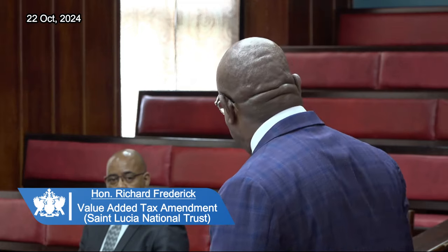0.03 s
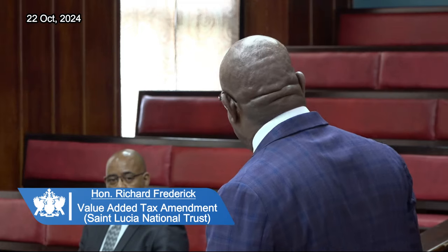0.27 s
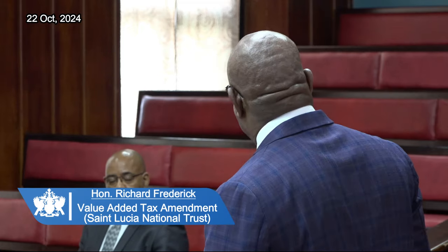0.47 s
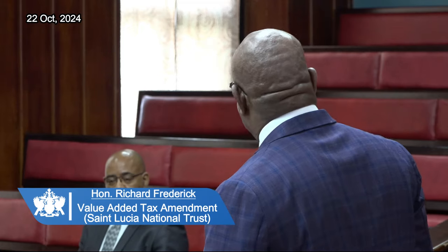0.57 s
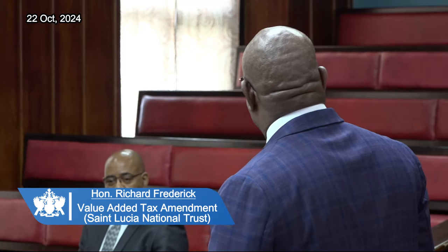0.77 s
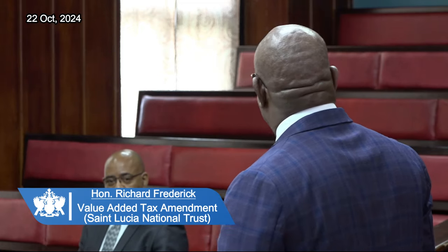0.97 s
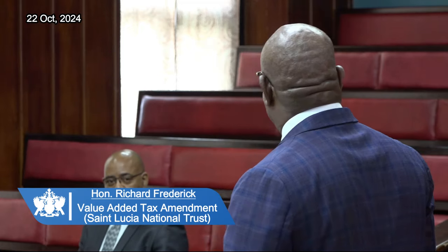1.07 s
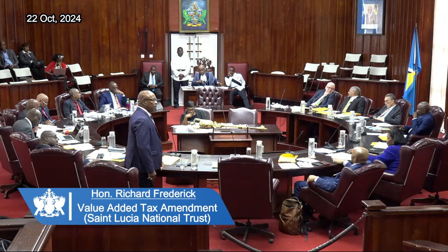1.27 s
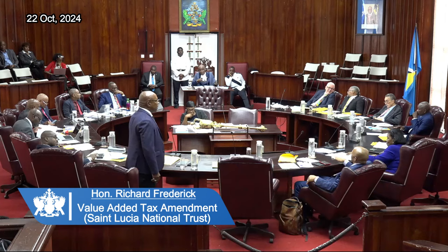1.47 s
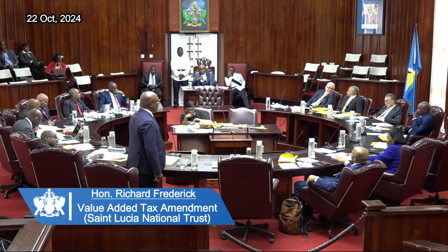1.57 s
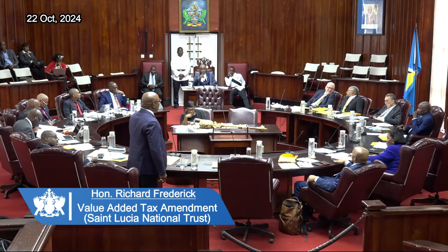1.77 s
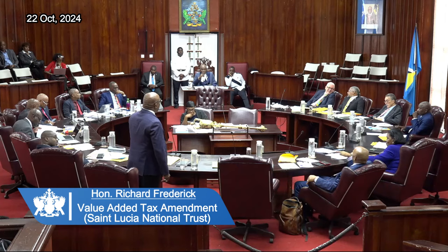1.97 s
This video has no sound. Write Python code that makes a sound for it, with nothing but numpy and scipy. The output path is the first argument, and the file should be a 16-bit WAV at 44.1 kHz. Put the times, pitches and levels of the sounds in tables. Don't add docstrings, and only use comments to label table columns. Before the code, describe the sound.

Hands pounding wooden desks in a steady fast rhythm, loud and close in a panelled chamber

```python
import sys
import numpy as np
from scipy import signal
from scipy.fft import rfft, irfft
from scipy.io import wavfile
from scipy.ndimage import uniform_filter1d

SR = 44100
rng = np.random.default_rng(int(sys.argv[2]) if len(sys.argv) > 2 else 0)


def to_linear_factor(level_db):
    exponent = np.asarray(level_db, float) / 20
    return 10 ** exponent


def waveform_to_disk(signal):
    frames = np.transpose(np.atleast_2d(signal))
    scaled = np.clip(frames, -1, 1) * 32767
    samples = np.round(scaled).astype(np.int16)
    wavfile.write(sys.argv[1], SR, samples)


N = 88817

# f/Hz, level/dB
AIR_TONE = [(30, 2), (90, -3), (250, -7), (1000, -15), (3000, -18), (7000, -29), (14000, -39)]
# f/Hz, level/dB
HALL_TONE = [(35, -36), (60, -15.5), (189, -4), (255, -7.5), (328, -5.5), (767, -15), (2110, -14.5),
             (3920, -24.5), (14500, -56.5)]
# f/Hz, t60/s
EARLY_DECAY = [(60, 1), (250, 0.22), (1000, 0.61), (3000, 0.37), (8000, .35), (14000, 0.75)]
# f/Hz, t60/s
LATE_DECAY = [(60, 0.4), (250, 1.11), (1000, 1.08), (3000, 0.95), (8000, 0.94), (14000, 1.1)]
# t/s, slap level/dB, slap f/Hz, skin crack level/dB, hall level/dB
BLOWS = [(.011, 3.5, 807, -6.5, -8.5), (0.0162, -11, 745, -5, -12.5), (.328, -11.5, 1140, -7.5, -16),
         (0.3431, 0.5, 817, -4.5, -9.5), (0.65, 1.5, 843, -6, -11), (.661, -27, 900, -9, -13),
         (.955, 0.5, 1070, -10.5, -10.5), (1.292, -14, 1400, -11.5, -14.5), (1.298, 1, 1160, -11.5, -13),
         (1.616, -13.5, 870, -11.5, -26.5), (1.641, -3, 1100, -10.5, -14.5), (1.9416, -15, 924, -16.5, -25)]
# knock level/dB, sheen level/dB, body level/dB
PALMS = [(-1.5, 10, -5.5), (1, 2, 5.5), (-9, 5.5, 3.5), (6, 0.5, -3.5), (-2, 4.5, 2), (-1, 5.5, 0.5),
         (-3.5, 4.5, -0.5), (-6.5, 1, 1.5), (7, 3.5, -7), (-4.5, 5.5, -4), (6.5, 1.5, -1.5),
         (-1.5, 4.5, 13)]
# second knock f/Hz, its level/dB, distance/share of the usual, knock width/Hz
SPOTS = [(1375, 2, .6, 165), (450, 2, 0.49, 120), (2680, 5, 0.44, 91), (1300, 1, 0.68, 77),
         (458, 6.5, .3, 67), (1300, -6, 0.45, 200), (1700, 2.5, .6, 92), (2260, 2, 0.62, 140),
         (1790, 4.5, .5, 200), (1310, -14, 0.58, 170), (1250, -19, 0.89, 380), (600, 5, .9, 69)]
WALL_RETURNS = [-2, -14, -14, 0, -6, -14, 0, -12, 0, -12, -2, -14]
# f/Hz, level/dB
CRACK_TONE = [(500, 4), (1500, 5), (3500, 2.5), (6000, -10.5), (10000, -16), (14000, -23.5)]
# f/Hz, level/dB, t60/s
WOOD_MODES = [(412.4, 3, 0.033), (533, -3.5, 0.047), (583, -51.5, 0.047), (772, -22.5, 0.16),
              (1061, -17.5, 0.082), (1270, -9, 0.044), (1646, -18.5, 0.16)]
# delay/s, level/dB
ECHOES = [(.0045, -12), (.018, -2), (.027, -14), (.040, -9), (.059, -14)]
# t/s, carcass level/dB, top panel level/dB, front panel level/dB, front panel f/Hz
BOOMS = [
    (0.014, -7, -5.5, 0, 307),
    (0.33, -10.5, -4, -6.5, 250),
    (0.346, -19, -19.5, -6.5, 316),
    (.650, -8.5, -7, -2.5, 284.8),
    (0.955, -21, -12.5, -13.5, 304.7),
    (1.299, -21.5, -5.5, -12, 297.4),
    (1.617, -23.5, -8, -8.5, 262.6),
    (1.642, -21, -4.5, -7, 317.2),
    (1.941, -26, -11.5, -17.5, 289),
]
BOOM_HOLDS = [0.98, 0.53, 1.3, 0.89, 1.52, 0.99, 0.5, 0.85, 1.06]
# f/Hz, level/dB, hold/s, t60/s, part (0 carcass, 1 top panel)
PANEL_MODES = [(36.7, -11.5, 0.02, 0.48, 0), (47.6, -12.5, .05, 0.73, 0), (69.2, -5.5, 0.038, 0.71, 0),
               (82.1, -8, 0.057, 0.79, 0), (130.6, -8, 0.027, 0.69, 0), (164.5, -14.5, 0.091, 0.25, 1),
               (200.17, -2.5, 0.051, 0.3, 1)]
# t/s, level/dB
TICKS = [(.225, -36), (0.589, -47), (0.655, -37), (.668, -24), (1.303, -43), (1.613, -41), (.983, -40),
         (0.99, -24.5), (1.137, -47), (1.435, -33.5), (1.737, -44)]

BEND_S, BEND_KNEE_HZ = 0.005, 297.2
FRONT_HOLD_S, FRONT_T60_S = 0.031, 0.33
LINGER_DB, CARCASS_LINGER_DB = -14, -7.5


def evened(x):
    return x / np.sqrt(np.mean(x ** 2) + 1e-20)


def read(points, hz):
    f, value = np.transpose(points)
    return np.interp(np.log(hz + 1), np.log(f + 1), value)


def add(mix, s, sound):
    part = mix[max(round(s * SR), 0):][:len(sound)]
    part += sound[:len(part)]


def colour(x, gain):
    return irfft(rfft(x) * gain(np.fft.rfftfreq(len(x), 1 / SR)), len(x))


def bump(hz, centre_hz, width):
    return np.exp(-0.5 * (np.log2((hz + 1) / centre_hz) / width) ** 2)


def burst(length_s, points):
    t = np.arange(1024) / SR
    puff = rng.standard_normal(1024) * (t / length_s) * np.exp(-t / length_s * 2)
    puff = colour(puff, lambda hz: to_linear_factor(read(points, hz)))
    return puff / abs(puff).max()


def air():
    hush = colour(rng.standard_normal(N), lambda hz: to_linear_factor(read(AIR_TONE, hz)))
    return to_linear_factor(-47.5) * evened(hush)


def hall():
    late_db, build_s, lumpy_db = -11.5, 0.034, 1.5
    hz = np.fft.rfftfreq(256, 1 / SR)[:, None]
    t = np.arange(700) * 64 / SR
    a, b, lumps = rng.standard_normal((700, 129, 3)).T
    lumps = uniform_filter1d(lumps, size=24, axis=0)
    lumps = evened(uniform_filter1d(lumps, size=3, axis=1))
    early = to_linear_factor(-60 * t / read(EARLY_DECAY, hz))
    late = to_linear_factor(late_db - 60 * t / read(LATE_DECAY, hz))
    z = (a + 1j * b) * np.hypot(early, late) * to_linear_factor(lumpy_db * lumps) * np.minimum(t / build_s, 1)
    tail = signal.istft(z, nperseg=256, noverlap=192)[1]
    tail = colour(tail, lambda f: to_linear_factor(read(HALL_TONE, f)))
    return tail / np.sqrt(np.mean(tail[:SR // 10] ** 2))


def palm(knock_db, sheen_db, body_db):
    def gain(hz):
        knock = knock_db * bump(hz, 3330, 0.31)
        sheen = sheen_db * bump(hz, 7160, 0.31)
        body = body_db * bump(hz, 480, 0.4)
        return to_linear_factor(knock + sheen + body)
    return gain


def slap(pitch_hz, second_hz, second_db, far, width_hz):
    size, skirt_db, knock_db, wave_top_hz = 8192, -3.5, 11, 4600
    hz = np.fft.rfftfreq(size, 1 / SR)
    broad = bump(hz, pitch_hz, 0.5) + to_linear_factor(skirt_db) * bump(hz, pitch_hz, 1.81)
    first = 1 / (1 + 2j * (hz - pitch_hz) / width_hz)
    second = to_linear_factor(second_db) / (1 + 2j * (hz - second_hz) / width_hz)
    lag = 2 * np.pi * far * BEND_S * (1000 + BEND_KNEE_HZ) * np.log(hz + BEND_KNEE_HZ)
    low_pass = 1 / np.hypot(1, (hz / wave_top_hz) ** 4)
    high_pass = 1 / np.hypot(1, (300 / (hz + 1)) ** 2)
    ragged = np.exp(6.5j * uniform_filter1d(rng.standard_normal(len(hz)), size=40))
    spectrum = (broad * ragged + to_linear_factor(knock_db) * (first - second)) * low_pass * high_pass
    wave = irfft(spectrum * np.exp(-1j * lag), size)
    t = np.arange(size) / SR
    wave = wave / abs(wave).max() * np.minimum(t / 0.001, 1) * (t < 0.1)
    onset = np.clip((t - BEND_S / 2) / 0.001, 0, 1)
    for f, db, t60 in WOOD_MODES:
        cycles = rng.uniform(0.95, 1.02) * f * t + rng.random()
        near = bump(f, pitch_hz, 0.83)
        wave = wave + near * to_linear_factor(db - 60 * t / t60) * onset * np.sin(2 * np.pi * cycles)
    return wave


def blows():
    crack_s, scatter_s, fingers_s = 0.0012, 0.0039, 0.0027
    scatter_share, fingers_db, echo_slap_db, before_db = 0.46, -13.5, -10.5, -52
    echo_dull_hz_s = 250
    direct, thrown, room = np.zeros((3, N))
    for blow, colours, spot, echo_db in zip(BLOWS, PALMS, SPOTS, WALL_RETURNS):
        s, slap_db, pitch_hz, crack_db, hall_db = blow
        tone = palm(*colours)
        wave = to_linear_factor(slap_db) * slap(pitch_hz, *spot)
        crack = to_linear_factor(crack_db) * colour(burst(crack_s, CRACK_TONE), tone)
        scatter = to_linear_factor(crack_db) * colour(burst(scatter_s, CRACK_TONE), tone)
        add(direct, s, scatter_share * scatter)
        add(direct, s - fingers_s, to_linear_factor(fingers_db) * scatter)
        add(direct, s - 0.001, wave)
        add(direct, s, crack)
        add(thrown, s - 0.0015, to_linear_factor(echo_db + echo_slap_db) * wave)
        add(thrown, s - 0.0005, to_linear_factor(echo_db) * crack)
        add(room, s, to_linear_factor(hall_db - 12) * colour(hall(), tone))
    add(room, 0, to_linear_factor(before_db) * evened(hall()[SR // 3:]))
    for s, db in ECHOES:
        echo = colour(thrown, lambda hz: 1 / np.hypot(1, (hz * s / echo_dull_hz_s) ** 2))
        add(room, s, to_linear_factor(db) * echo)
    return direct + room


def ring(hz, db, hold_s, t60, linger_db):
    t = np.arange(SR // 2) / SR
    rise = 1 - np.exp(-(t / 0.015) ** 2)
    fade = np.exp(-(t / hold_s) ** 3) + to_linear_factor(linger_db - 60 * t / t60)
    cycles = hz * rng.uniform(1.0, 1.01) * t + rng.random()
    return to_linear_factor(db) * fade * rise * np.sin(2 * np.pi * cycles)


def booms():
    under_share, under_db = 0.84, -6.5
    out = np.zeros(N)
    for (s, carcass_db, top_db, front_db, front_hz), share in zip(BOOMS, BOOM_HOLDS):
        for hz, db, hold_s, t60, part in PANEL_MODES:
            part_db, linger_db = (top_db, LINGER_DB) if round(part) else (carcass_db, CARCASS_LINGER_DB)
            add(out, s, ring(hz, db + part_db, share * hold_s, t60, linger_db))
        front_hold_s = share * FRONT_HOLD_S
        add(out, s, ring(front_hz, front_db, front_hold_s, FRONT_T60_S, LINGER_DB))
        add(out, s, ring(front_hz * under_share, front_db + under_db, front_hold_s, FRONT_T60_S, LINGER_DB))
    return out


def ticks():
    out = np.zeros(N)
    for s, db in TICKS:
        add(out, s - 0.001, to_linear_factor(db) * burst(0.0015, [(2000, -30), (8650, -1), (14000, -4)]))
    return out


def scene():
    return (air() + blows() + booms() + ticks())[None]


def band_limit(x):
    return signal.sosfilt(signal.butter(12, 15800, fs=SR, output="sos"), x)


def record(dry):
    edge_hz, low_cut_hz, clip = 14500, 36, 0.785
    limited = signal.oaconvolve(dry, signal.firwin(255, edge_hz, fs=SR)[None], "same")
    limited = signal.lfilter(*signal.butter(1, low_cut_hz, "high", fs=SR), limited)
    return band_limit(np.clip(limited, -clip, clip))


dry = scene()
out = record(dry)
waveform_to_disk(out)
```